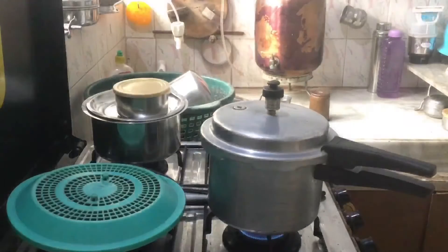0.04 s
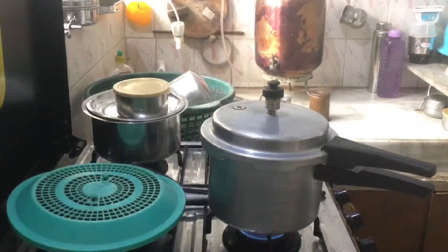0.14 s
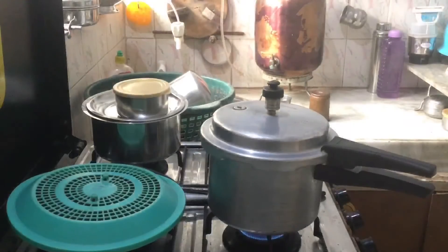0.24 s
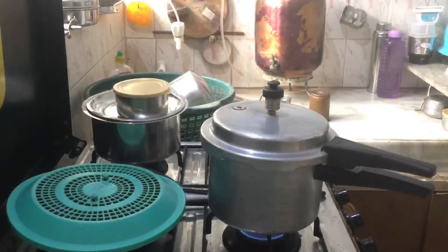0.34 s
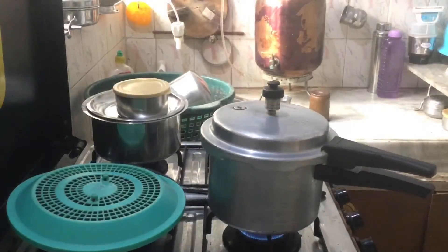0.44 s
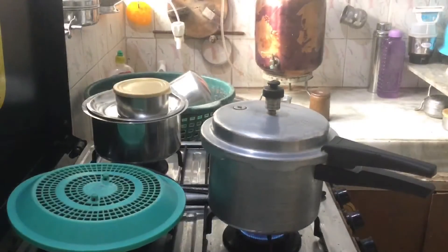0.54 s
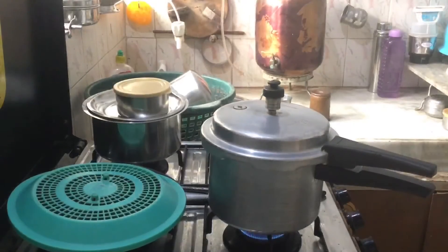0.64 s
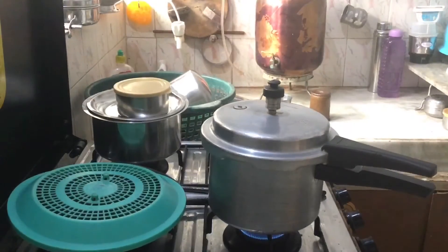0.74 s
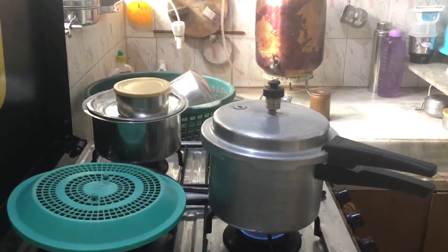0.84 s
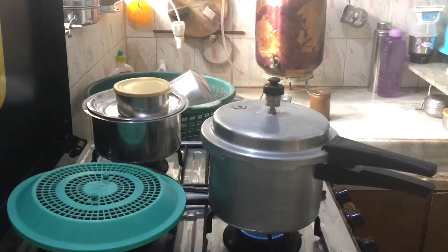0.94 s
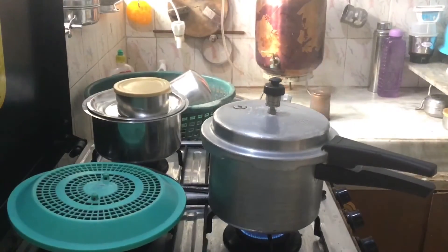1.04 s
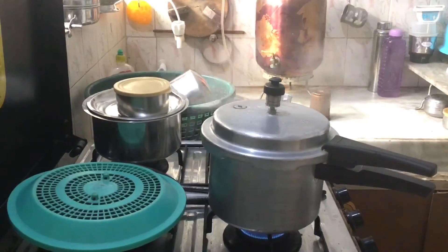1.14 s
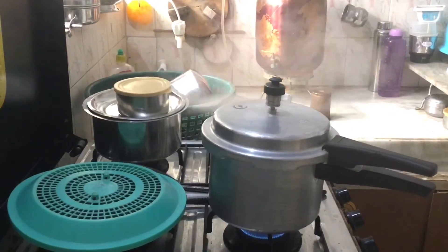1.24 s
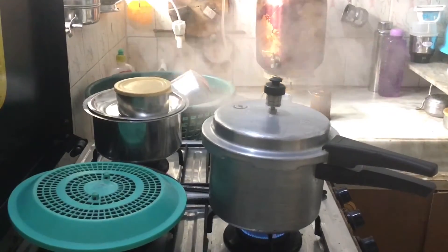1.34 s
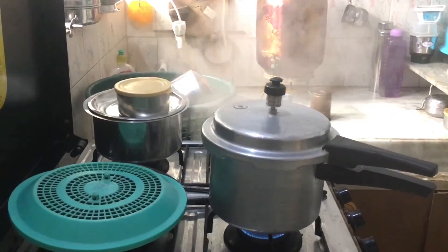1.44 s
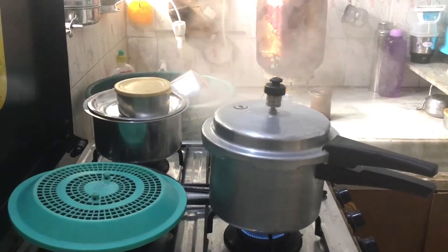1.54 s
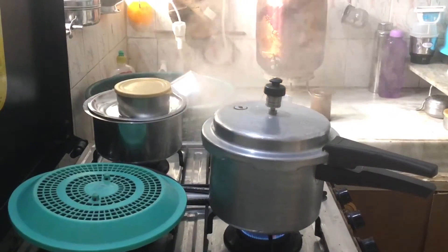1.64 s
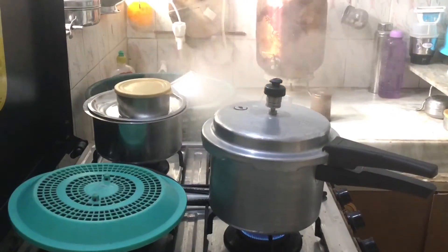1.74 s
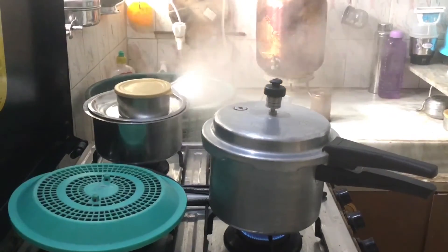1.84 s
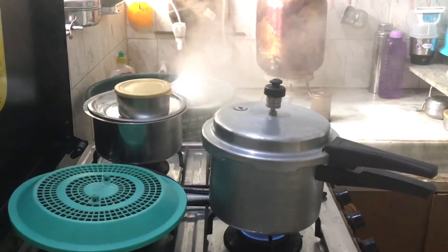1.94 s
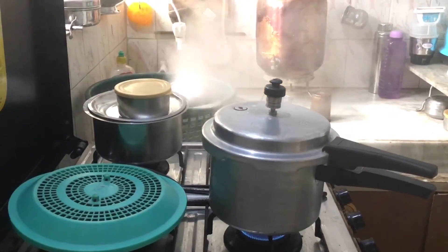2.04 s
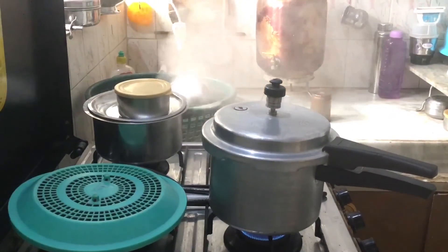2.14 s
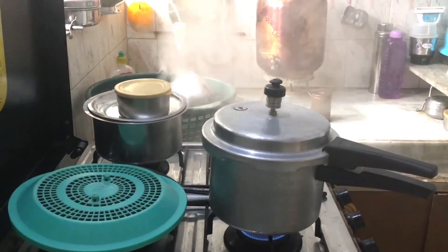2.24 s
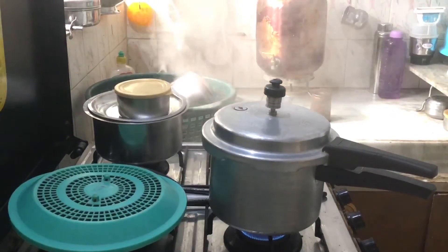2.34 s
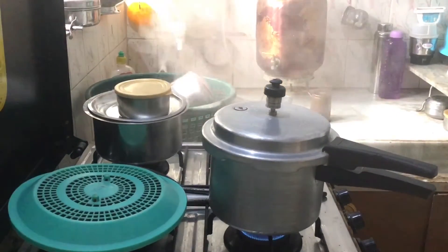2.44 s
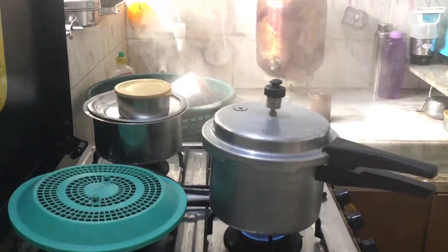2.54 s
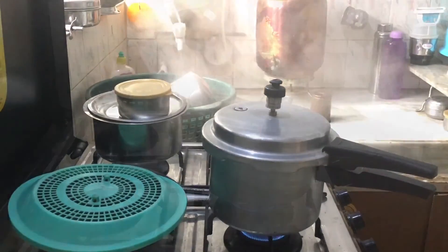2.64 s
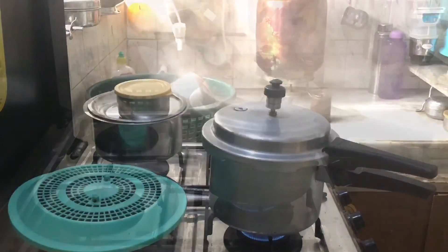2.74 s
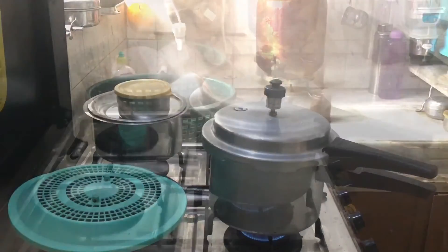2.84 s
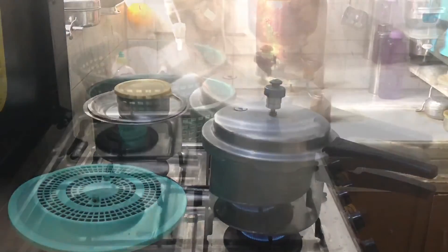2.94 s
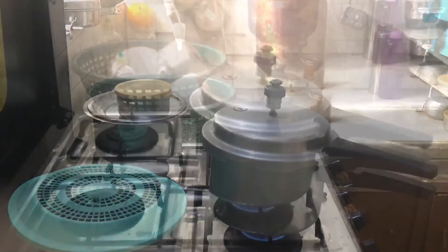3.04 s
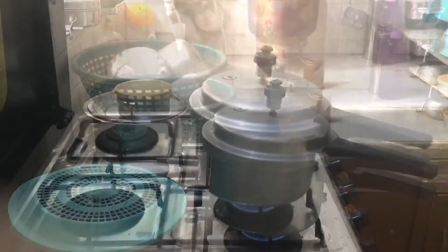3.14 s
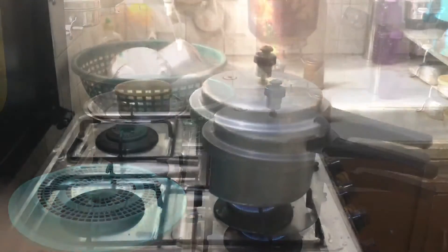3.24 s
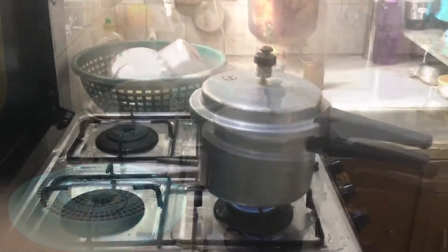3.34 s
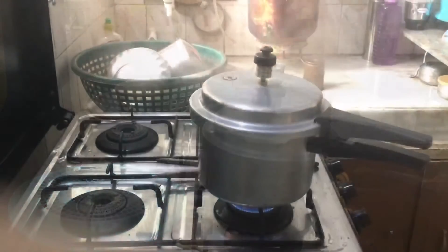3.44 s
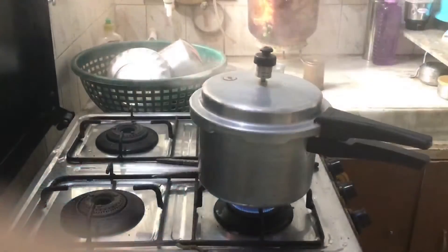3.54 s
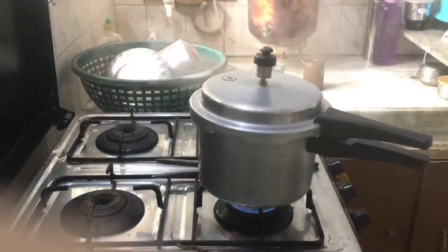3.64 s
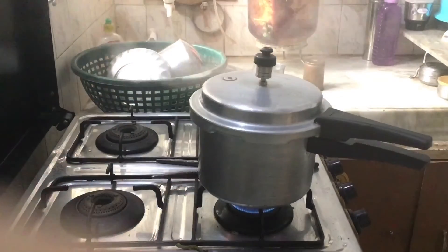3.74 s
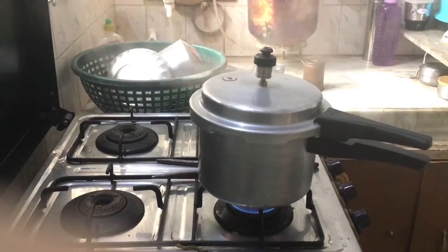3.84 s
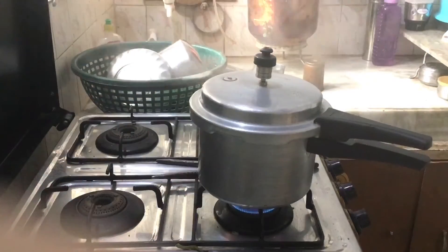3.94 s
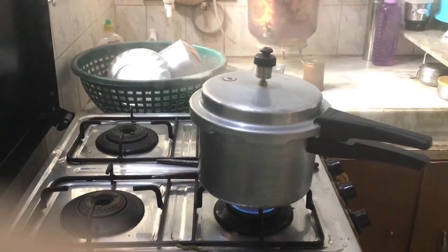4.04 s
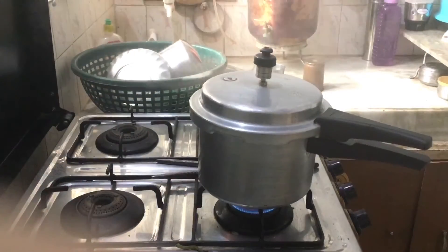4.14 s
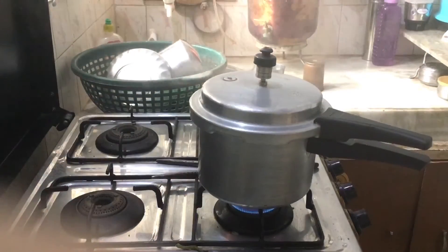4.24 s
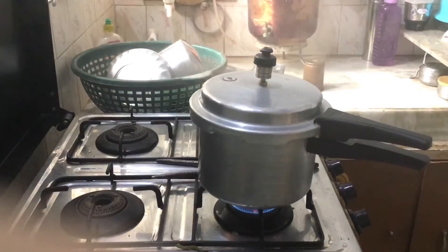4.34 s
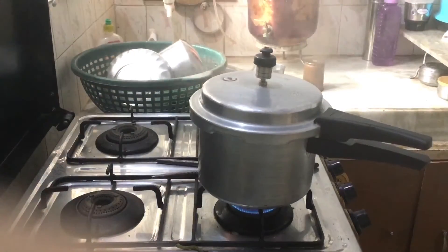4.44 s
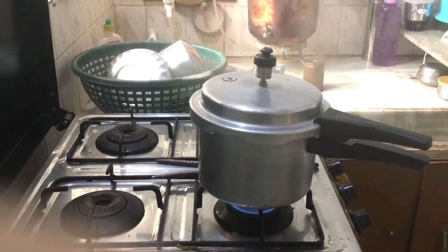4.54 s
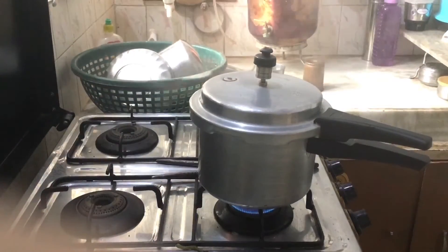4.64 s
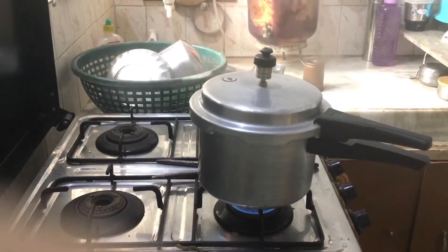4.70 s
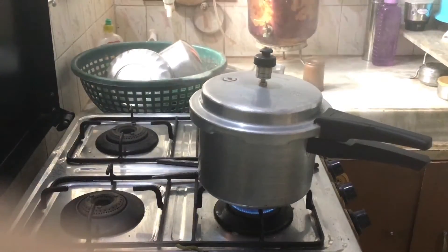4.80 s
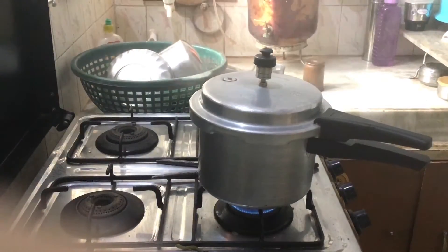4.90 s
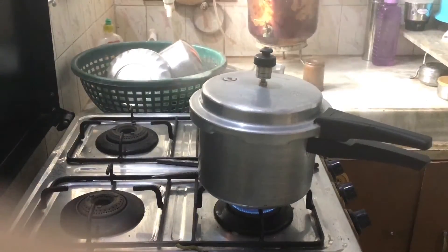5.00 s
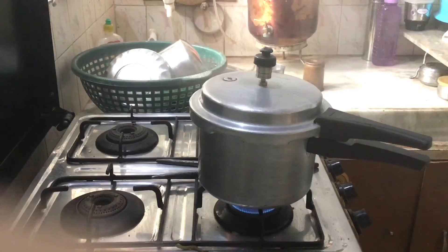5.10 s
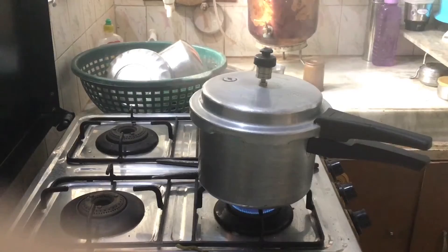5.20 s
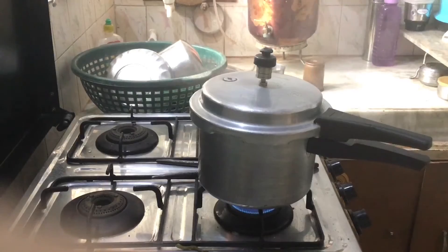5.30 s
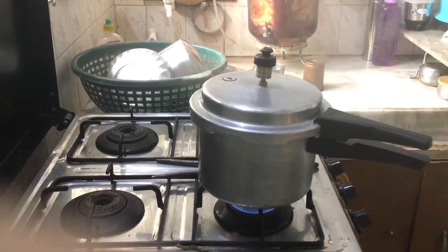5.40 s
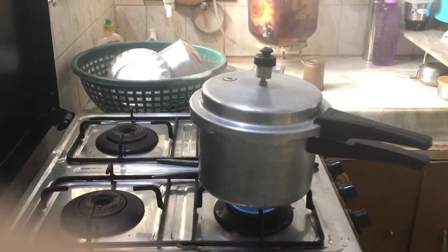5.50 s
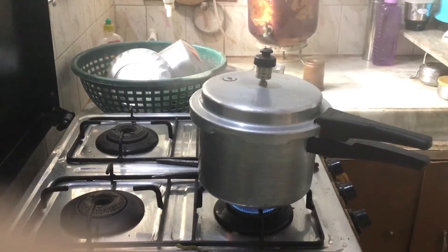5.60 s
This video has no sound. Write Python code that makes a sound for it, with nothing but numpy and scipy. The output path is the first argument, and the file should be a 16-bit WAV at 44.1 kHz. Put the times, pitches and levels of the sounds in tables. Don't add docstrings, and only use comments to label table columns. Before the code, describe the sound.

In a small tiled kitchen, a pressure cooker close to the microphone first leaks thin, spitting steam over a low unsteady motor hum and a dying pot ring. After about a second the weight lifts with a hollow puff and bright steam blasts out. It blends into a second, similar blow-off, holding steady until a dull touch of the dropping weight at the very end.

```python
import sys
import numpy as np
from scipy import signal
from scipy.fft import rfft, irfft, next_fast_len
from scipy.io import wavfile
from scipy.ndimage import uniform_filter1d, map_coordinates

SR = 44100
rng = np.random.default_rng(int(sys.argv[2]) if len(sys.argv) > 2 else 0)


def store_wav(level_fs):
    pcm = np.round(np.clip(np.atleast_2d(level_fs), -1, 1) * 32767)
    wavfile.write(sys.argv[1], SR, pcm.T.astype(np.int16))


def natural_amplitude(level_db):
    exponent = np.asarray(level_db, float) / 20
    return 10 ** exponent


N = 249826
CLOCK = np.arange(N) / SR

# start/s, end/s
DISSOLVE = (2.59, 3.56)
# t/s, low tone level/dB, high tone re low/dB, half length/s
SWELLS = [(.31, -47.5, -17, 0.35), (.85, -46.5, -12, 0.14), (1.03, -65, 10, 0.12),
          (1.313, -51.5, -2.5, 0.2), (1.56, -61, -0.5, 0.092), (1.842, -66, -11, .12),
          (2.05, -57, -8, 0.11), (2.218, -56, -8, 0.061), (3.919, -64, -3, 0.28), (4.5, -60, -5, 0.11),
          (5.22, -69, 8, 0.13)]


def unit(x):
    return x / np.sqrt(np.mean(x ** 2) + 1e-20)


def along(points, hz):
    f, db = np.transpose(points)
    return np.interp(np.log(hz + 1), np.log(f + 1), db)


def wobble(rate):
    knots = rng.standard_normal(int(N * rate / SR) + 4)
    return map_coordinates(knots, [CLOCK * rate])


def bump(s, half_s):
    return np.exp(-((CLOCK - s) / half_s) ** 2)


def filtered(x, response):
    m = next_fast_len(N + SR // 2)
    return irfft(rfft(x, m) * response(np.fft.rfftfreq(m, 1 / SR)), m)[..., :N]


def shaped_noise(response):
    return unit(filtered(rng.standard_normal(N), response))


def above(x, corner_hz):
    return filtered(x, lambda hz: 1 / (1 + (corner_hz / (hz + 1)) ** 10))


def dissolve():
    start, end = DISSOLVE
    return np.clip((CLOCK - start) / (end - start), 0, 1)


def resonances(modes, hz):
    power = 0
    for centre, width, db in modes:
        damping = (hz * width) ** 2
        power = power + natural_amplitude(2 * db) * damping / ((centre * centre - hz * hz) ** 2 + damping + 1)
    return power


def turbulence(patchy_db):
    z = signal.stft(rng.standard_normal(N), nperseg=512)[2]
    field = uniform_filter1d(rng.standard_normal(z.shape), size=20, axis=0)
    field = uniform_filter1d(field, size=10, axis=1)
    return signal.istft(z * natural_amplitude(patchy_db * unit(field)), nperseg=512)[1][:N]


def kitchen(dips, wet_db, t60):
    t = CLOCK[:SR // 2]
    hz = np.fft.rfftfreq(len(t), 1 / SR)
    tail = rng.standard_normal(len(t)) * natural_amplitude(-60 * t / t60)
    power = np.abs(1 + rfft(natural_amplitude(wet_db) * tail / np.linalg.norm(tail))) ** 2
    ripple = np.sqrt(power / uniform_filter1d(power, size=70))
    cut = natural_amplitude(sum(db * np.exp(-((hz - centre) / width) ** 2) for centre, width, db in dips))
    return lambda f: np.interp(f, hz, ripple * cut)


def hiss(spectrum, modes, walls, patchy_db, low_hz):
    def response(hz):
        colour = np.sqrt(natural_amplitude(2 * along(spectrum, hz)) + resonances(modes, hz))
        return colour / (1 + (low_hz / (hz + 1)) ** 4) * walls(hz)
    return unit(filtered(turbulence(patchy_db), response))


def steam():
    # f/Hz, level/dB per Hz
    leak_colour = [(300, -9.8), (980, -22.0), (1450, -20.5), (2030, -15.7), (2350, -7.0), (4050, -11.4),
                   (5500, -8.3), (6900, -7.9), (9350, -8.9), (9900, -16.1), (12000, -17.3), (14400, -16.1),
                   (15300, -17.7), (15740, -15.5)]
    first_colour = [(300, -31.0), (980, -31.7), (1450, -31.5), (2030, -16.2), (2350, -4.8), (4050, -7.3),
                    (5500, -8.4), (6900, -7.3), (9350, -6.9), (9900, -12.0), (12000, -19.1), (14400, -17.9),
                    (15300, -18.4), (15740, -13.9)]
    second_colour = [(300, -25.6), (980, -28.5), (1450, -32.0), (2030, -19.6), (2350, -5.8), (4050, -3.5),
                     (5500, -1.7), (6900, -7.0), (9350, -8.9), (9900, -11.9), (12000, -15.5),
                     (14400, -14.5), (15300, -11.8), (15740, -11.6)]
    # f/Hz, width/Hz, level/dB
    leak_modes = [(750, 140, -13.7), (1000, 90, -13.7), (1210, 90, -13.4), (1820, 100, -10.2),
                  (2840, 260, -5.3), (3670, 300, -5.8), (4670, 500, -7.8), (6170, 350, -0.4),
                  (7950, 260, -4.2), (8660, 500, -5.4), (9550, 180, -8.7), (10690, 90, -20.0),
                  (14090, 500, -16.9)]
    first_modes = [(750, 230, -18.6), (1190, 110, -18.3), (1830, 110, -9.1), (2930, 250, -0.5),
                   (3630, 280, -3.6), (4600, 360, -6.5), (5070, 300, -9.1), (6250, 500, -2.6),
                   (7170, 100, -8.3), (7910, 330, -2.6), (8660, 500, -5.7), (9220, 500, -8.2),
                   (11120, 500, -16.1), (12490, 290, -20.1), (13850, 370, -18.0)]
    second_modes = [(750, 170, -18.1), (1200, 130, -18.9), (1800, 110, -8.8), (2800, 110, -4.4),
                    (3290, 180, -4.5), (3830, 90, -17.2), (4590, 310, -3.8), (4930, 190, -4.5),
                    (5740, 90, -15.0), (6920, 160, -10.5), (8060, 500, -10.7), (8770, 290, -3.0),
                    (9570, 180, -8.5), (12280, 170, -15.8), (13240, 140, -16.8)]
    # f/Hz, width/Hz, depth/dB
    dips_here = [(980, 80, -3), (1450, 90, -2), (4070, 130, -3), (5400, 150, -1.5), (6900, 130, -1.5),
                 (7380, 110, -2.5), (9850, 150, -1.5)]
    dips_there = [(970, 80, -2.5), (1400, 80, -2.5), (3020, 90, -2), (4050, 150, -1), (10150, 200, -1.5),
                  (11900, 150, -1.5), (12750, 170, -2), (13550, 150, -2)]
    # t/s, extra level/dB, half length/s
    spurts = [
        (.03, 1, 0.039),
        (.25, 1.8, 0.072),
        (.38, 5, 0.072),
        (0.54, 2, 0.031),
        (.81, -2, .03),
    ]
    shut_db, open_db = -36, -24
    lift_s, rise_s = 0.82, 0.19
    leak_db, blow_db, again_db = -41, -20, -21.5
    sag_db_per_s = 0.5

    rise = np.clip((CLOCK - lift_s) / rise_s, 0, 1)
    seep_db = leak_db + sum(db * bump(s, half_s) for s, db, half_s in spurts)
    sag_db = sag_db_per_s * np.maximum(CLOCK - lift_s - rise_s, 0)
    level_db = seep_db + rise * (blow_db - seep_db) - sag_db
    second_db = again_db - sag_db_per_s * (CLOCK - DISSOLVE[1])
    lift = np.clip((level_db - shut_db) / (open_db - shut_db), 0, 1) * (CLOCK > lift_s)
    lift = np.maximum.accumulate(lift)

    here = kitchen(dips_here, wet_db=-7.5, t60=0.11)
    there = kitchen(dips_there, wet_db=-7.0, t60=0.27)
    leak = hiss(leak_colour, leak_modes, here, patchy_db=1.85, low_hz=595)
    first = hiss(first_colour, first_modes, here, patchy_db=0.43, low_hz=273)
    second = hiss(second_colour, second_modes, there, patchy_db=0.28, low_hz=260)
    later = dissolve()
    opening = np.sqrt(1 - lift) * leak + np.sqrt(lift) * first
    jet = (1 - later) * natural_amplitude(level_db) * opening + later * natural_amplitude(second_db) * second

    flutter_db = 0.067 * wobble(18) + 0.23 * wobble(45)
    flutter_db = flutter_db * (1 + 8 * lift * (1 - lift) + 1.1 * (1 - lift)) + 0.33 * wobble(16)
    half_open = np.sin(np.pi * rise)
    drift_db = 0.27
    dull_db = drift_db * wobble(17) - 3.5 * half_open
    jet = jet + (natural_amplitude(dull_db) - 1) * above(jet, corner_hz=5070)
    sizzle_db = drift_db * wobble(9.1) + 4.5 * half_open
    jet = jet + (natural_amplitude(sizzle_db) - 1) * above(jet, corner_hz=10000)
    return natural_amplitude(flutter_db) * jet


def puff():
    # t/s, level/dB
    breath_levels = [(.9, -68), (.935, -55), (.96, -37.5), (1.0, -36.5), (1.035, -47), (1.065, -41.5),
                     (1.14, -59), (1.3, -56)]
    # f/Hz, width/Hz, level/dB
    cavity = [(790, 130, 0), (660, 110, -4), (440, 60, -10), (1300, 250, -11), (340, 120, -12),
              (200, 80, -11)]
    breath = shaped_noise(lambda hz: resonances(cavity, hz) ** 0.73)
    s, db = np.transpose(breath_levels)
    start, end = s[0], s[-1]
    gate = np.interp(CLOCK, [start - .02, start, end - .15, end], [0, 1, 1, 0])
    return gate * natural_amplitude(np.interp(CLOCK, s, db) + 3.5) * breath


def weight_drop():
    # t/s, f/Hz, width/Hz, level/dB
    fall = (5.652, 900, 200, -41)
    s, centre_hz, width_hz, db = fall
    thud = shaped_noise(lambda hz: resonances([(centre_hz, width_hz, 0)], hz))
    return natural_amplitude(db) * np.clip((CLOCK - s) / 0.0064, 0, 1) * thud


def flame():
    # f/Hz, level/dB per Hz
    rumble = [(15, -62), (25, -32), (45, -9), (65, 0.5), (157, -1), (189, 1.5), (230, -7.5), (339, -4),
              (377, -21), (460, -11), (600, -14), (780, -37), (1320, -120)]
    # t/s, extra level/dB, half length/s
    draught = [
        (1.044, 11.5, 0.11),
        (1.27, 8.5, 0.062),
    ]
    here_db, there_db, flicker_db = -59.5, -56.5, 0.9
    later = dissolve()
    burn = np.hypot((1 - later) * natural_amplitude(here_db), later * natural_amplitude(there_db))
    fanned_db = flicker_db * wobble(7) + sum(db * bump(s, half_s) for s, db, half_s in draught)
    roar = unit(filtered(turbulence(patchy_db=1.2), lambda hz: natural_amplitude(along(rumble, hz))))
    return burn * natural_amplitude(fanned_db) * roar


def pot_ring():
    # f/Hz, level/dB, t60/s
    pot_modes = [(289, -51, 0.41), (547, -49, 0.11)]
    return sum(natural_amplitude(db - 60 * CLOCK / t60) * np.sin(2 * np.pi * hz * CLOCK) for hz, db, t60 in pot_modes)


def low_hum():
    tone_hz = (77, 110.4)
    # f/Hz, width/Hz, level/dB
    fuzzy_lines = [(190, 13, 5.5), (225, 6.7, 7), (355.5, 26, 5), (139, 8.8, 9)]
    rest_db = -73
    low = natural_amplitude(rest_db) + sum(natural_amplitude(db) * bump(s, half_s) for s, db, _, half_s in SWELLS)
    high = natural_amplitude(rest_db) + sum(natural_amplitude(db + re_low_db) * bump(s, half_s) for s, db, re_low_db, half_s in SWELLS)
    tones = [np.sin(2 * np.pi * hz * CLOCK + .8 * wobble(6)) for hz in tone_hz]
    fuzz = shaped_noise(lambda hz: resonances(fuzzy_lines, hz) ** 0.79)
    hum = natural_amplitude(1.0 + 0.9 * wobble(11)) * low * tones[0]
    hum = hum + natural_amplitude(-0.5 + 2.7 * wobble(10)) * high * tones[1]
    return hum + natural_amplitude(-9) * low * fuzz


def room_air():
    # f/Hz, level/dB per Hz
    murmur = [(250, -30), (400, -3), (700, -5), (1200, -6), (1600, -8), (2200, -30), (4000, -120)]
    air = unit(filtered(turbulence(patchy_db=0.0), lambda hz: natural_amplitude(along(murmur, hz))))
    return natural_amplitude(-61) * air


def scene():
    cooker = steam() + puff() + weight_drop()
    background = flame() + pot_ring() + low_hum() + room_air()
    return np.tile(cooker + background, (2, 1))


def side_bursts():
    # t/s, low edge f/Hz, high edge f/Hz, side level/dB
    side_bands = [(.104, 7600, 9000, -50), (1.288, 13100, 14600, -42.5), (3.308, 6230, 8300, -34.5),
                  (3.54, 6900, 8300, -32), (4.213, 4280, 7500, -28), (4.214, 11800, 13100, -42),
                  (4.562, 7600, 8960, -33), (4.562, 12500, 13800, -44), (4.864, 13100, 15700, -41)]
    side = np.zeros(N)
    for s, low_hz, high_hz, db in side_bands:
        band = shaped_noise(lambda hz: (hz > low_hz) & (hz < high_hz))
        window = np.cos(np.pi / 2 * np.clip((CLOCK - s) / .021, -1, 1)) ** 1.5
        side += natural_amplitude(db) * window * band
    return np.array([side, -side])


def roll_off(x):
    return signal.sosfilt(signal.butter(12, 16830, fs=SR, output="sos"), x)


def record(dry):
    top_hz, bass_hz = 15750, 38
    mix = filtered(dry + side_bursts(), lambda hz: (hz < top_hz) / (1 + (bass_hz / (hz + 1)) ** 4))
    return roll_off(mix)


dry = scene()
out = record(dry)
store_wav(out)
```